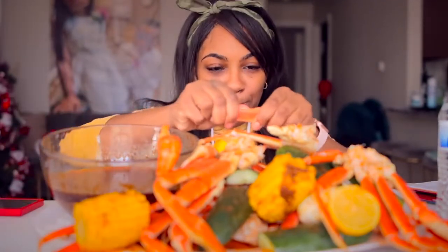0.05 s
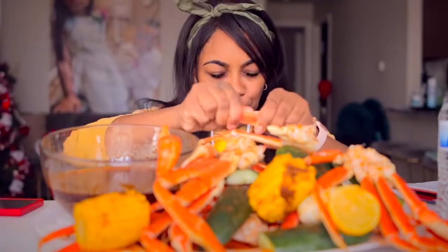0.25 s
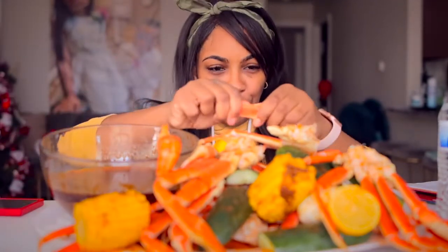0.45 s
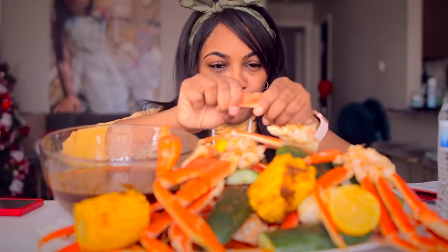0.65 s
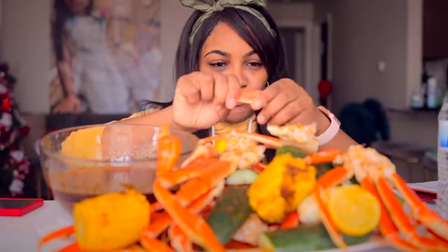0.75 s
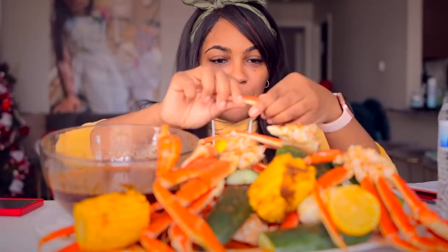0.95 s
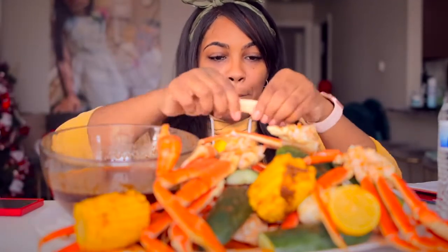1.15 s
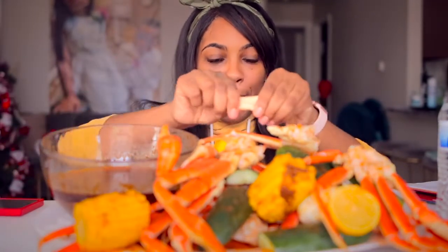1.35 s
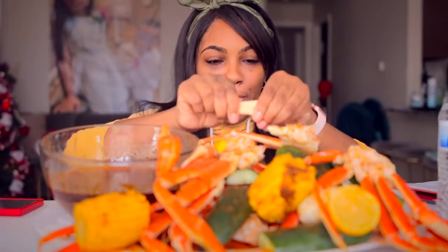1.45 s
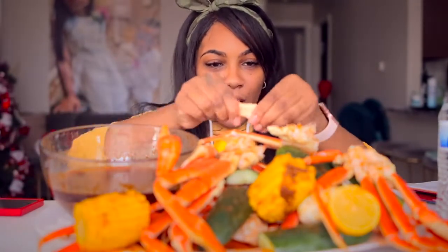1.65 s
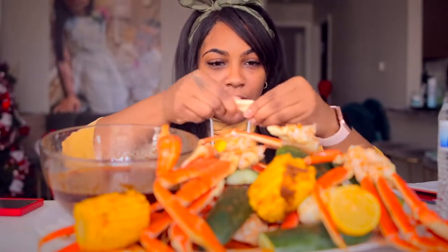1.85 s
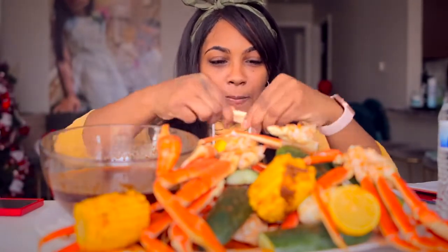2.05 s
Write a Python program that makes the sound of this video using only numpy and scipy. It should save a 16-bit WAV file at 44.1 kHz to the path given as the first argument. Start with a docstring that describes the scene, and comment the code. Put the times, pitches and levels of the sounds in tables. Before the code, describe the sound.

A crab leg breaks with a loud hollow snap, then brittle crackling as fingers pull it apart

```python
"""A cooked crab leg is broken by hand close to a microphone in a live dining room.
Dull knocks, filtered noise bumps, come before and just after one loud snap: damped shell modes, a noise tear
and the pop of the hollow leg, loud enough to overload the recorder. A second later the fingers pry it open:
dry cracks of click, splinter noise and short ring, with tiny ticks and fibre crackle.
Echoes and a diffuse noise tail make the room, over quiet room tone of coloured noise."""
import sys
import numpy as np
from scipy import signal
from scipy.fft import rfft, irfft, next_fast_len
from scipy.io import wavfile

SR = 44100
rng = np.random.default_rng(int(sys.argv[2]) if len(sys.argv) > 2 else 0)


def output_pcm(signal):
    """Save a mono or channel-first signal as 16-bit PCM at the path in sys.argv[1].

    Samples are clipped to [-1, 1] before scaling.
    """
    pcm = np.clip(np.atleast_2d(signal).T, -1, 1) * 32767
    wavfile.write(sys.argv[1], SR, np.round(pcm).astype(np.int16))


N = 92610  # samples, 2.1 s

TILT_PIVOT_HZ, RESONANCE_OCTAVES = 7500, 0.23
EVENT_WINDOW_S = 0.004  # length over which crack and tick levels count
SPLINTER_ATTACK_S, SPLINTER_T60_S = 0.0001, 0.013  # shared by splinters and fibres


def amp(db):
    """Decibels to linear amplitude."""
    return 10 ** (np.asarray(db) / 20)


def unit(x):
    """Scale x to an RMS of one."""
    return x / np.sqrt(np.mean(x ** 2) + 1e-20)


def along(points, hz):
    """Read a curve of (frequency, value) points along a log frequency axis."""
    point_hz, value = np.transpose(points)
    return np.interp(np.log(hz + 1), np.log(point_hz + 1), value)


def coloured(x, points, tilt_db=0, peak_hz=1000, peak_db=0):
    """Causal filter: a drawn spectrum, a treble tilt in dB per octave and one resonance."""
    m = 2 * next_fast_len(x.shape[-1] // 2 + 2048)
    hz = np.fft.rfftfreq(m, 1 / SR)
    tilt = tilt_db * np.log2(np.maximum(hz, 3000) / TILT_PIVOT_HZ)  # flat below 3 kHz
    octaves_off = np.log2((hz + 1) / peak_hz)
    resonance = peak_db / (1 + (octaves_off / RESONANCE_OCTAVES) ** 2)
    db = along(points, hz) + tilt + resonance
    # fold the cepstrum forward in time: minimum phase, so no pre-ringing
    cepstrum = irfft(np.log(amp(db)), m)
    cepstrum[1:m // 2] *= 2
    cepstrum[m // 2 + 1:] = 0
    response = np.exp(rfft(cepstrum))
    return irfft(rfft(x, m) * response, m)[..., :x.shape[-1]]


def clock():
    """The time axis of one short event, 0.2 s long."""
    return np.arange(SR // 5) / SR


def envelope(attack, t60, hold=0):
    """Exponential rise, hold, then a decay of 60 dB in t60 seconds."""
    t = clock()
    rise = 1 - np.exp(-t / attack)
    decay = np.exp(-np.log(1000) * np.maximum(t - hold, 0) / t60)
    return rise * decay


def ring(modes, attack):
    """Damped modes (f/Hz, level/dB, T60/s) set off together, neighbours in opposite directions."""
    out = np.zeros(len(clock()))
    for k, (hz, db, t60) in enumerate(modes):
        swing = np.cos(2 * np.pi * hz * clock())
        out += (-1) ** k * amp(db) * envelope(attack, t60) * swing
    return out


def burst(points, attack, t60, hold=0, **colour):
    """A short rush of noise under an envelope, then coloured."""
    shape = envelope(attack, t60, hold)
    return coloured(shape * rng.standard_normal(len(shape)), points, **colour)


def sized(x, db, seconds=EVENT_WINDOW_S):
    """Give x the energy of a sound of that RMS level and length."""
    return amp(db) * x * np.sqrt(seconds * SR / np.sum(x ** 2))


def add(track, s, x):
    """Lay x into the track at s seconds."""
    i = max(round(s * SR), 0)
    track[i:i + len(x)] += x[:N - i]


AIR_DB, AIR_SIDE_DB = -55.5, -7  # overall scaling; side level relative to the middle
# spectrum of the room tone; columns: f/Hz, level/dB
AIR_SPECTRUM = [(20, -1), (35, -18.5), (90, -20), (150, -17), (200, -23.5), (300, -17), (400, -23),
                (600, -23), (1300, -25.5), (2000, -30), (3000, -41.5), (6000, -45.5), (13500, -49.5),
                (16000, -54)]


def air():
    """Quiet, steady room tone: shared noise in the middle, weaker independent noise at the sides."""
    mid, side = unit(coloured(rng.standard_normal((2, N)), AIR_SPECTRUM))
    side = amp(AIR_SIDE_DB) * side
    return amp(AIR_DB) * np.array([mid + side, mid - side])


KNOCK_ATTACK_S, KNOCK_T60_S = 0.0022, 0.11
# dull knocks at the table; columns: t/s, level/dB over 25 ms
KNOCK_EVENTS = [(0.0, -49), (.019, -49.5), (.171, -42), (.382, -41)]
# boxy spectrum of the table; columns: f/Hz, level/dB
TABLE_SPECTRUM = [(100, -22), (180, -13), (250, -0.5), (340, -8), (450, -4.5), (580, 0), (740, -5.5),
                  (950, -18.5), (1300, -20), (1750, -17.5), (4000, -37), (9000, -43.5), (14000, -56.5)]


def knocks():
    """Soft, boxy bumps at the table: decaying noise with its weight in the low mids."""
    out = np.zeros(N)
    for s, db in KNOCK_EVENTS:
        bump = burst(TABLE_SPECTRUM, KNOCK_ATTACK_S, KNOCK_T60_S)
        add(out, s, sized(bump, db, seconds=0.025))
    return out


SPLIT_S, BREAK_S = 0.2320, 0.2340  # the shell starts to split; the leg gives way
SPLIT_ATTACK_S, BREAK_ATTACK_S = 0.00086, 0.00045
TEAR_DB, TEAR_S, TEAR_T60_S = -13, 0.0031, 0.012  # fracture noise: level, running time, decay
# modes of the splitting shell; columns: f/Hz, level/dB, T60/s
SHELL_MODES = [(1843, -11, 0.02), (2940, -8.5, 0.02), (4534, -16.5, 0.024), (5110, -20, .022),
               (6560, -19.5, 0.018), (7260, -6, 0.015), (7530, 6, 0.01), (8130, -8, .018),
               (8780, -16, 0.024), (10030, -18, .014), (12170, -17, 0.011)]
# spectrum of the fracture noise; columns: f/Hz, level/dB
TEAR_SPECTRUM = [(100, -16.5), (300, -7.5), (600, 0.5), (850, -4), (1200, 2), (2200, -2.5), (3500, -3.5),
                 (6000, -2.5), (8000, 1), (10000, -2.5), (13000, -4), (16000, -10.5)]
# modes of the hollow leg in the cupped hands, before the bass cut; columns: f/Hz, level/dB, T60/s
HOLLOW_MODES = [(218, -21.5, .018), (430, -14.5, 0.03), (585, -7.5, .02), (719.6, -10.5, 0.021),
                (1093, -15, .016), (1246, -15.5, .013)]
# bass cut that keeps the low thud out of the pop; columns: f/Hz, level/dB
POP_BASS_CUT = [(30, -14), (120, -5), (350, 2), (16000, 0)]


def snap():
    """A fracture runs along the shell, which shrieks; then the hollow leg pops apart."""
    out = np.zeros(N)
    tear = burst(TEAR_SPECTRUM, SPLIT_ATTACK_S, TEAR_T60_S, TEAR_S)
    pop = coloured(ring(HOLLOW_MODES, BREAK_ATTACK_S), POP_BASS_CUT)
    add(out, SPLIT_S, ring(SHELL_MODES, SPLIT_ATTACK_S))
    add(out, SPLIT_S, sized(tear, TEAR_DB))
    add(out, BREAK_S, pop)
    return out


SPREAD_DB, SPREAD_S = -15, 0.2335
# the snap as it spreads in all directions, its modes smeared; columns: f/Hz, level/dB
SPREAD_SPECTRUM = [(100, -12), (300, -5.5), (450, 6), (650, 10.5), (900, -2), (1150, 6.5), (1500, -3.5),
                   (1900, 4), (2600, -3.5), (4000, -6.5), (6000, -2), (7400, 7), (9500, -6.5), (13000, -9),
                   (16000, -22.5)]


def snap_spread():
    """The snap's sound towards the walls: one impulse coloured by the smeared modes."""
    out = np.zeros(N)
    pulse = coloured(signal.unit_impulse(len(clock())), SPREAD_SPECTRUM)
    add(out, SPREAD_S, sized(pulse, SPREAD_DB))
    return out


TICK_ATTACK_S, TICK_T60_S, TICK_RESONANCE_DB = 0.00073, 0.025, 10.5
FIBRES_PER_S, FIBRE_SPREAD_DB = 600, 3  # mean rate; random spread of strength
# faint ticks of shell and fingers; columns: t/s, level/dB over 4 ms, resonance f/Hz
TICK_EVENTS = [(0.552, -56.5, 7040), (0.6019, -54, 3270), (.6693, -61, 1100), (0.778, -62.5, 8070),
               (0.8016, -59, 2000), (.89, -66, 4600), (0.9318, -59.5, 2200), (0.9518, -60, 1800),
               (1.016, -61, 13000), (1.0331, -59.5, 1980), (1.0824, -57, 3600), (1.218, -61.5, 1082),
               (2.063, -60.5, 9740)]
# tick spectrum before its resonance; columns: f/Hz, level/dB
TICK_SPECTRUM = [(300, -5), (2000, 5.5), (5000, -9.5), (9000, -12.5), (16000, -23)]
# fibres tearing under the fingers; columns: start t/s, end t/s, level/dB
FIBRE_PULLS = [(0.783, 0.842, -71.5), (1.138, 1.22, -69.5), (1.398, 1.611, -60.5), (1.659, 1.753, -59.5)]
# spectrum of the fibre crackle; columns: f/Hz, level/dB
FIBRE_SPECTRUM = [(300, -9), (1500, 4.5), (4000, -3.5), (8000, 0.5), (11000, -7), (16000, -8)]


def fingers():
    """Faint resonant ticks of handling, and fibres tearing as a crackle of randomly timed noise grains."""
    out = np.zeros(N)
    for s, db, hz in TICK_EVENTS:
        tick = burst(TICK_SPECTRUM, TICK_ATTACK_S, TICK_T60_S, peak_hz=hz, peak_db=TICK_RESONANCE_DB)
        add(out, s, sized(tick, db))
    grain = envelope(SPLINTER_ATTACK_S, SPLINTER_T60_S)
    for start, end, db in FIBRE_PULLS:
        size = max(int((end - start) * SR), 1)
        chance = rng.random(N)[:size]
        strength = rng.standard_normal(N)[:size]
        grit = rng.standard_normal(N)[:size]
        slips = (chance < FIBRES_PER_S / SR) * amp(FIBRE_SPREAD_DB * strength)
        crackle = grit * signal.fftconvolve(slips, grain)[:size]
        add(out, start, amp(db) * unit(coloured(crackle, FIBRE_SPECTRUM)))
    return out


PIECE_ATTACK_S, RESONANCE_DB = 0.00045, 8
FIRST_SLIP = 0.6  # size of the opening click against the rush that follows
# cracks while prying; columns: t/s, ring level/dB, ring f/Hz, splinter level/dB,
# splinter tilt in dB per octave, splinter resonance f/Hz (levels over 4 ms)
CRACK_EVENTS = [(1.3118, -55, 1660, -54.5, 1.5, 8300), (1.35, -38, 1637, -32.5, 2, 9000),
                (1.3555, -25, 1650, -28.5, 2.5, 4500), (1.374, -26, 1720, -27.5, 1, 2940),
                (1.4058, -34, 1370, -40.5, 1, 8400), (1.408, -39.5, 1530, -35.5, 2.5, 8500),
                (1.413, -37.5, 1670, -34, -1, 8670), (1.426, -46, 1400, -38.5, 3.5, 8300),
                (1.446, -45, 1530, -42.5, 2.5, 6100), (1.473, -61, 1460, -44, 4, 12000),
                (1.487, -47, 1740, -40.5, 8, 5330), (1.5053, -50.5, 1760, -42.5, 7, 6040),
                (1.532, -53, 1500, -43.5, 5, 6000), (1.5783, -34.5, 1660, -34, 3, 8760),
                (1.5927, -44, 1300, -49.5, 6, 7170), (1.6749, -49.5, 1260, -48.5, 2, 8600),
                (1.69, -47.5, 1190, -63, -6, 8500), (1.7172, -48.5, 1480, -43.5, -1, 4700),
                (1.7468, -53.5, 1240, -49, 6, 8400), (1.7887, -31.5, 1456, -26, 3, 10600),
                (1.8888, -28.5, 1265, -27, 0, 4530), (1.931, -45, 1290, -35, 1.5, 8500),
                (1.9547, -45.5, 1597, -37.5, -1, 8820), (1.9566, -44.5, 1660, -48, 5.5, 8600),
                (1.962, -38.5, 1620, -44.5, -7, 4040), (2.0935, -53, 1794, -48.5, -2, 7620)]
# modes of the opened shell before scaling to the ring level; columns: ratio to ring f, level/dB, T60/s
PIECE_MODES = [(.5, -18, .011), (.76, 0.5, .014), (.95, -3, .009), (1.15, -1, 0.022), (1.4, -5, 0.011),
               (1.9, -12, .008)]
# splinter spectrum before tilt and resonance; columns: f/Hz, level/dB
SPLINTER_SPECTRUM = [(150, -31), (600, -8), (900, -10), (1300, 0), (3000, 2), (4500, 0), (6000, 0),
                     (8000, 2), (11000, -4), (14000, -1.5), (16000, -11.5)]


def cracks():
    """Each crack is a sharp click, a bright splinter burst and a brief ring of the piece that breaks."""
    out = np.zeros(N)
    for s, ring_db, ring_hz, splinter_db, tilt_db, peak_hz in CRACK_EVENTS:
        modes = [(ring_hz * ratio, db, t60) for ratio, db, t60 in PIECE_MODES]
        add(out, s, sized(ring(modes, PIECE_ATTACK_S), ring_db))
        rush = envelope(SPLINTER_ATTACK_S, SPLINTER_T60_S) * rng.standard_normal(len(clock()))
        click = FIRST_SLIP * signal.unit_impulse(len(rush))
        fracture = rush / np.linalg.norm(rush) + click
        splinter = coloured(fracture, SPLINTER_SPECTRUM, tilt_db, peak_hz, RESONANCE_DB)
        add(out, s, sized(splinter, splinter_db))
    return out


NEAR_PAN_DB = 2.26  # left raised and right lowered by this: hands a little to the left
NEAR_SPREAD_DB = -10.5  # the part that differs between the ports
# first wall echoes, one row a port (left, right); columns: delay t/s, level/dB
WALL_ECHOES = [(0.0123, -18), (0.0197, -28)]


def near(x):
    """Direct sound from the hands, scattered a little differently to each port, and the first wall echoes."""
    scatter = envelope(0.00018, 0.008) * rng.standard_normal(len(clock()))
    scatter = scatter / np.linalg.norm(scatter)
    side = amp(NEAR_SPREAD_DB) * signal.fftconvolve(x, scatter)[:N]
    out = np.array([x + side, x - side]) * amp([[NEAR_PAN_DB], [-NEAR_PAN_DB]])
    for port, (delay, db) in zip(out, WALL_ECHOES):
        add(port, delay, amp(db) * x)
    return out


ROOM_DELAY_S, ROOM_BUILD_S = 0.0044, 0.0022
# decay time of the dining room; columns: f/Hz, T60/s
ROOM_DECAY = [(200, 0.71), (530, 0.46), (1400, 0.56), (3700, 0.5), (7500, 0.46), (14000, 0.29)]
# colour of the tail; columns: f/Hz, level/dB
ROOM_SPECTRUM = [(150, -6), (600, 1), (1500, -2), (4000, 0.5), (7500, -1), (14000, -0.5)]


def room(x):
    """Convolve with a diffuse noise tail, unrelated at the two ports, whose top treble dies first."""
    noise = rng.standard_normal((2, SR * 3 // 4))
    hz, t, bands = signal.stft(noise, SR, nperseg=256)
    decay = np.exp(-np.log(1000) * t / along(ROOM_DECAY, hz)[:, None])
    tail = signal.istft(bands * decay, SR, nperseg=256)[1]
    since_onset = np.maximum(np.arange(tail.shape[1]) / SR - ROOM_DELAY_S, 0)
    tail = tail * (1 - np.exp(-since_onset / ROOM_BUILD_S))
    tail = coloured(tail / np.linalg.norm(tail[0]), ROOM_SPECTRUM)
    return signal.fftconvolve(x[None], tail, axes=1)[:, :N]


ROOM_DB, KNOCK_ROOM_DB, SNAP_ROOM_DB = -10.5, -3, -20  # sends to the room: handling, knocks, direct snap


def scene():
    """Shell sounds and knocks, heard directly and through the room, over the room tone."""
    big, small, bumps = snap(), cracks() + fingers(), knocks()
    # the cracks' room tail averages three independent draws of their noise
    crack_echo = (room(small) + room(cracks()) + room(cracks())) / np.sqrt(3)
    snap_echo = room(snap_spread() + amp(SNAP_ROOM_DB) * big)
    knock_echo = amp(KNOCK_ROOM_DB) * room(bumps)
    walls = snap_echo + amp(ROOM_DB) * crack_echo + knock_echo
    return air() + near(big + small + bumps) + walls


TOP_HZ = 16050  # middle of the 600 Hz wide roll-off


def record(dry):
    """The recorder overloads flat at full scale, then rolls off everything above its band limit."""
    overloaded = np.clip(dry, -1, 1)
    m = next_fast_len(N + SR // 2)
    hz = np.fft.rfftfreq(m, 1 / SR)
    band = np.clip((TOP_HZ - hz) / 600 + 0.5, 0, 1)
    return irfft(rfft(overloaded, m) * band, m)[:, :N]


dry = scene()
out = record(dry)
output_pcm(out)
```